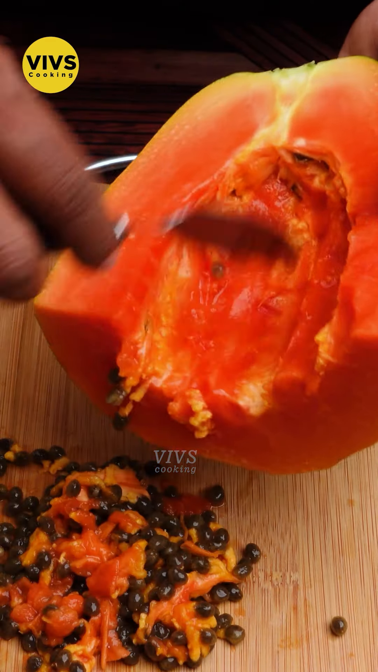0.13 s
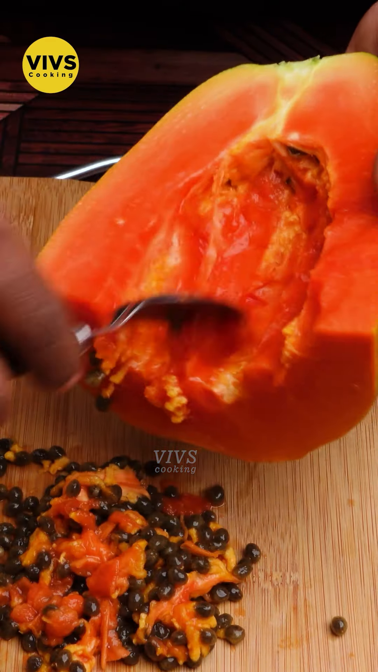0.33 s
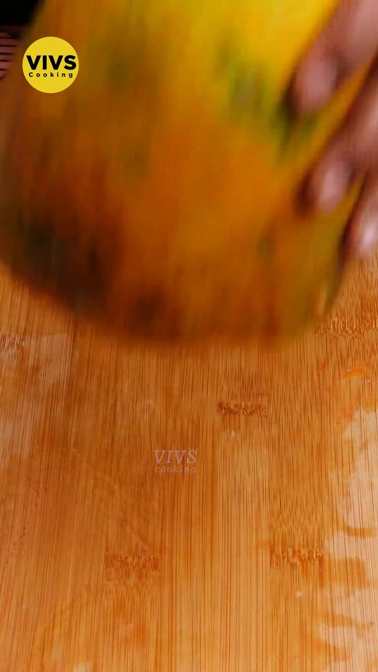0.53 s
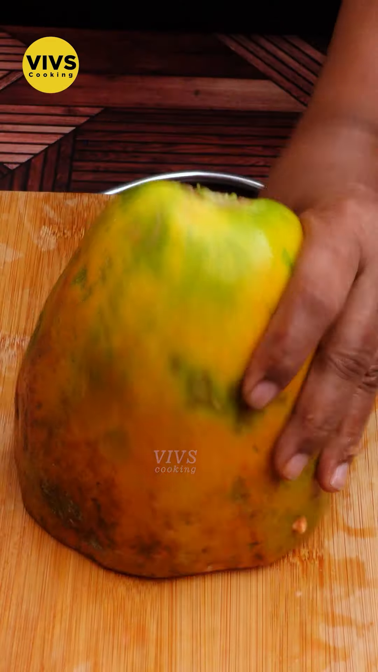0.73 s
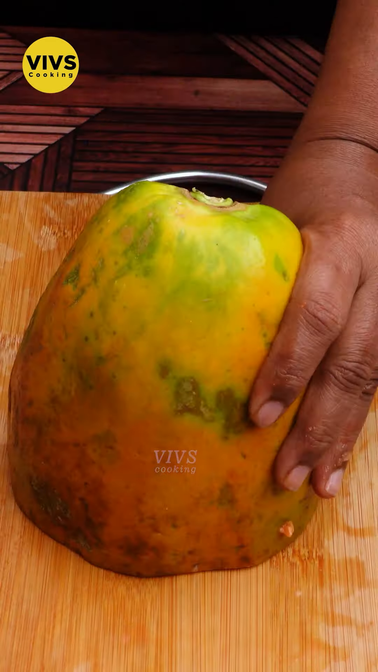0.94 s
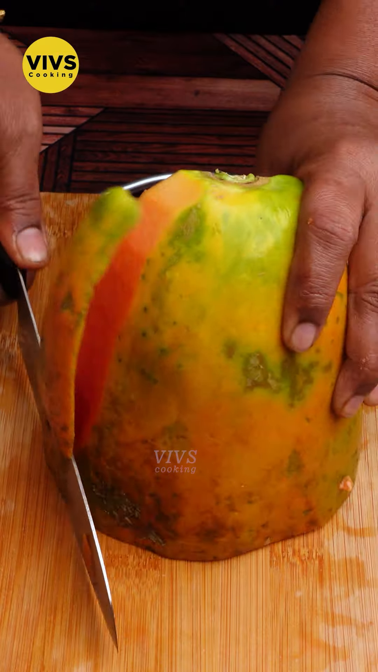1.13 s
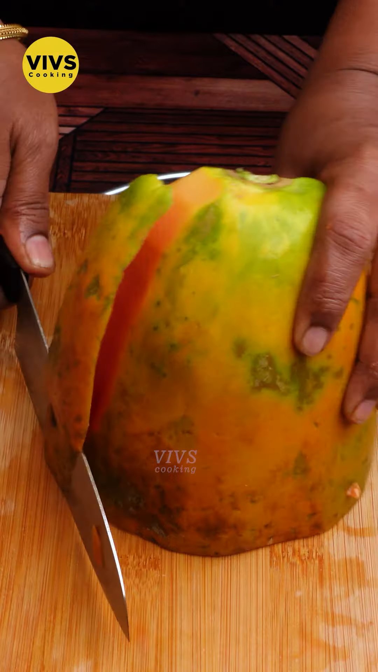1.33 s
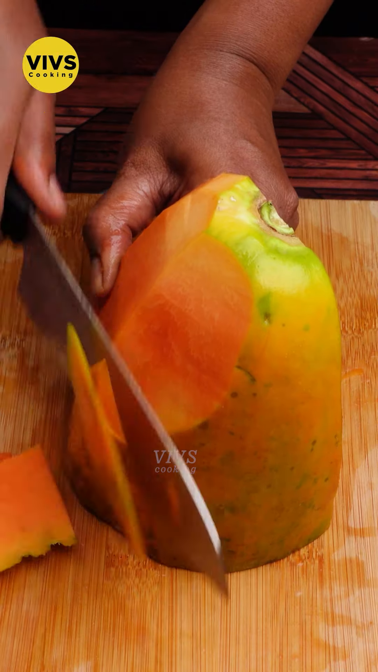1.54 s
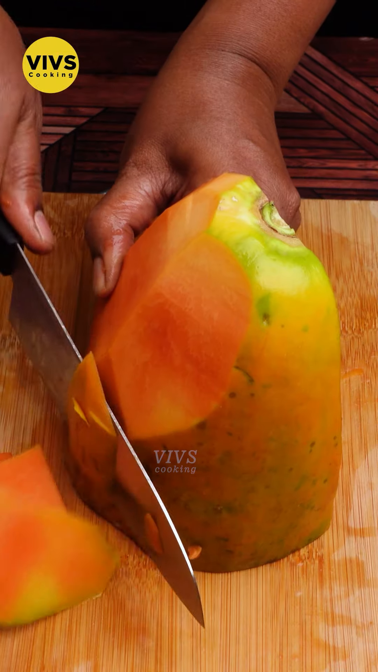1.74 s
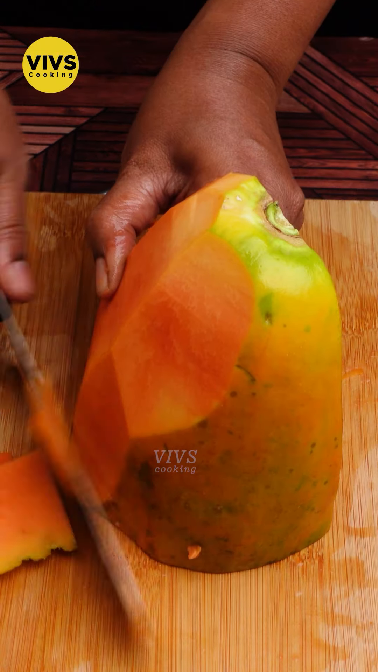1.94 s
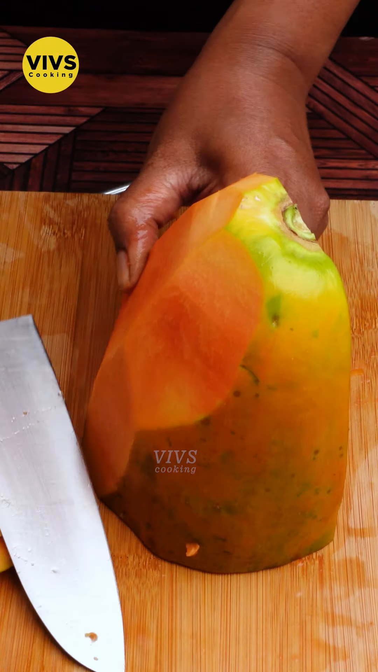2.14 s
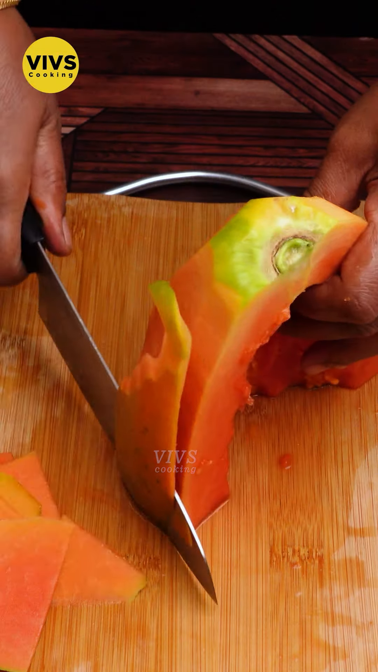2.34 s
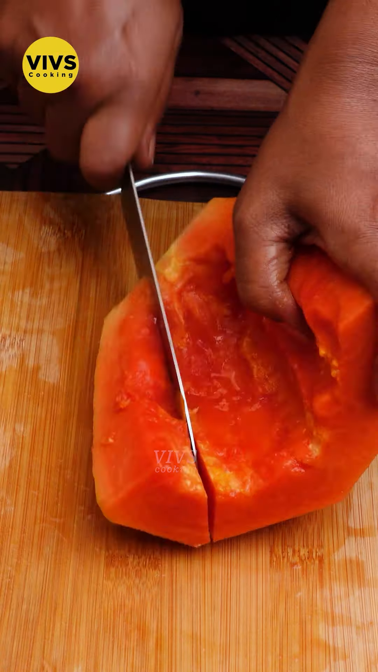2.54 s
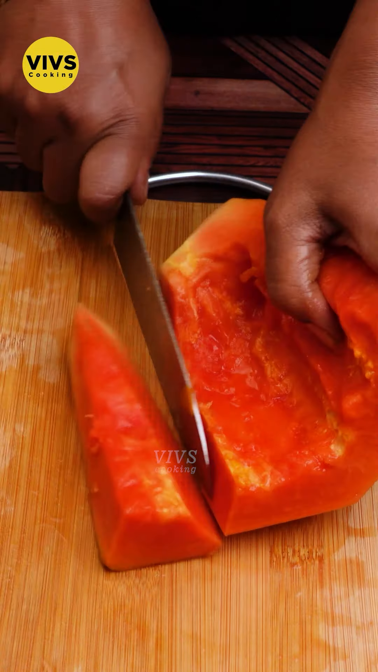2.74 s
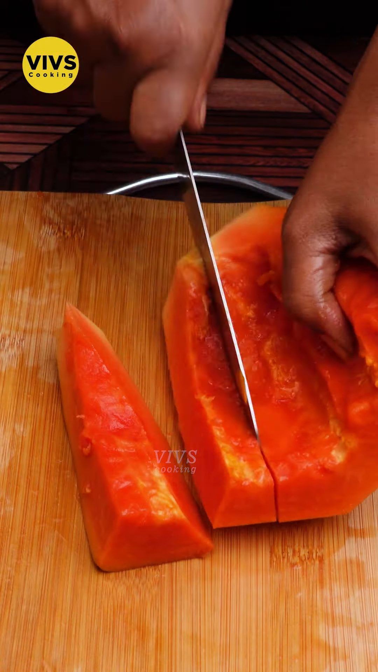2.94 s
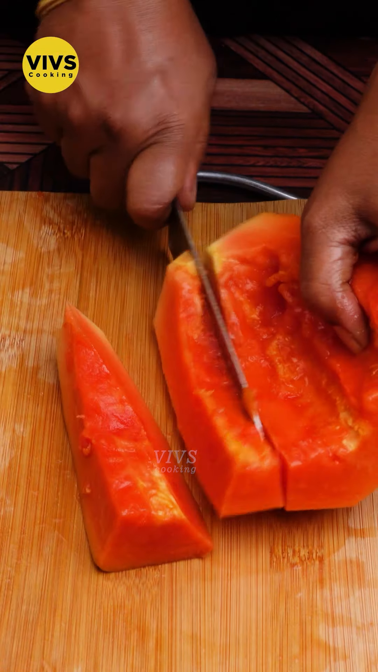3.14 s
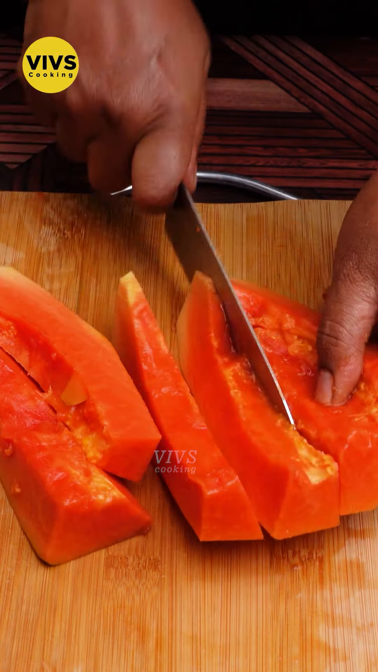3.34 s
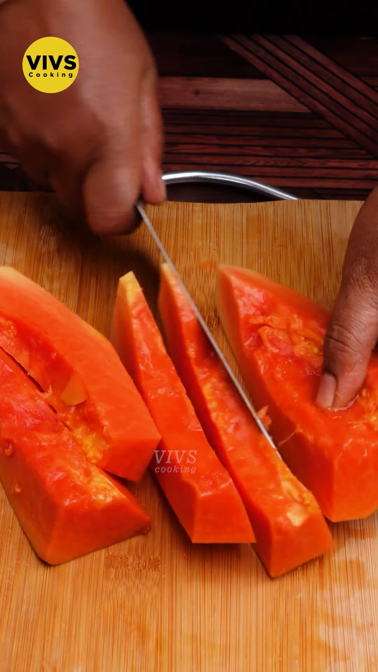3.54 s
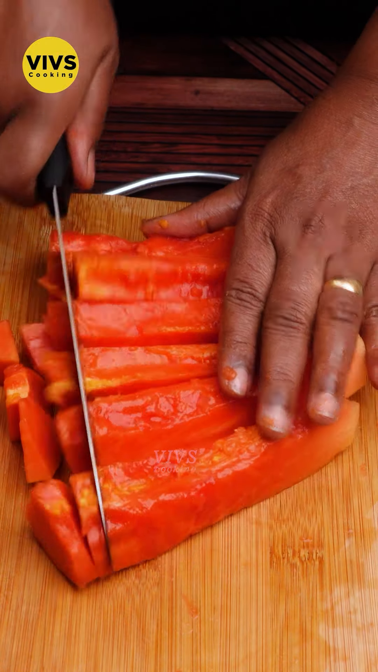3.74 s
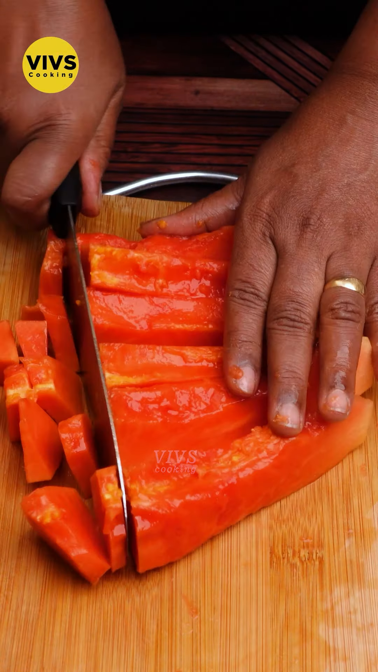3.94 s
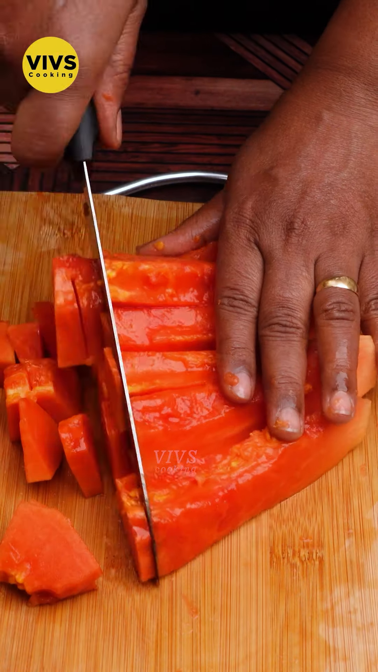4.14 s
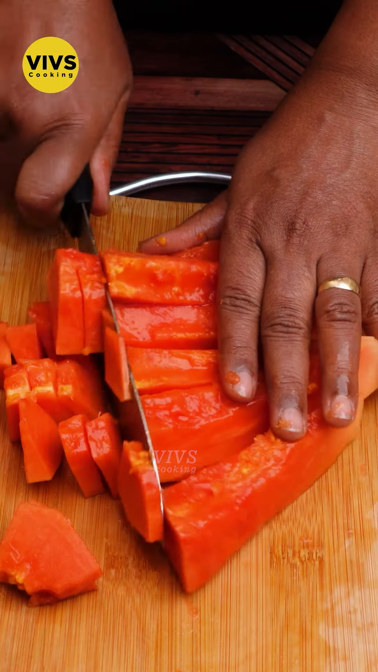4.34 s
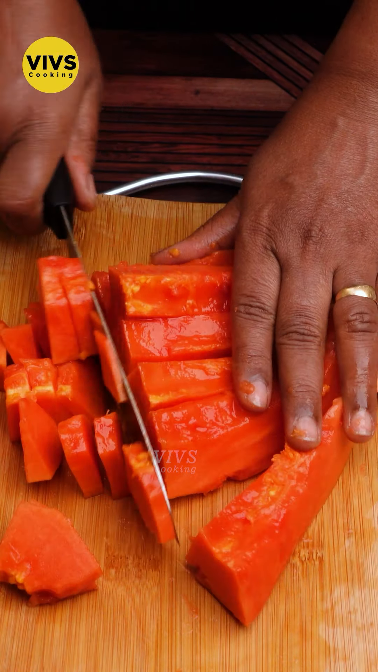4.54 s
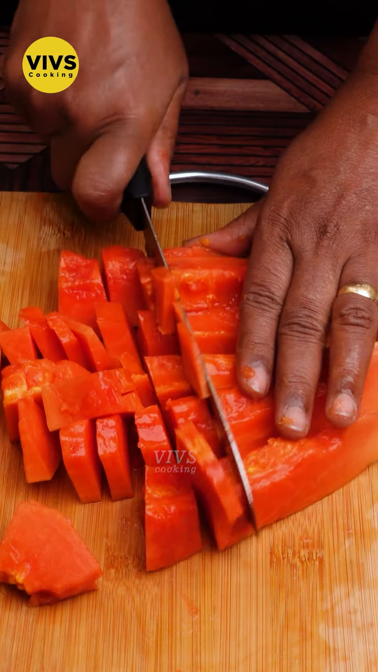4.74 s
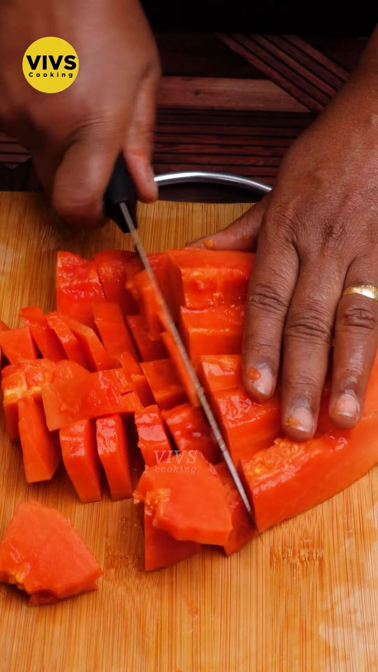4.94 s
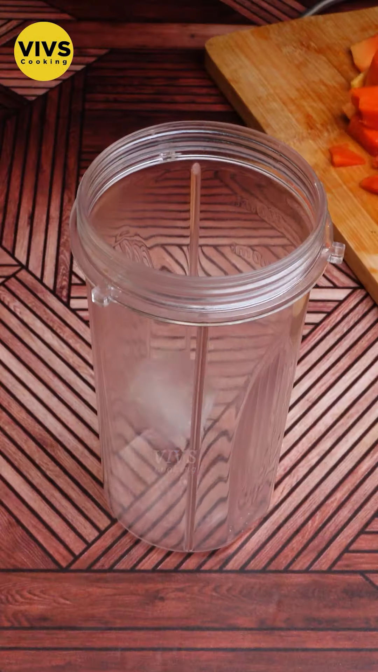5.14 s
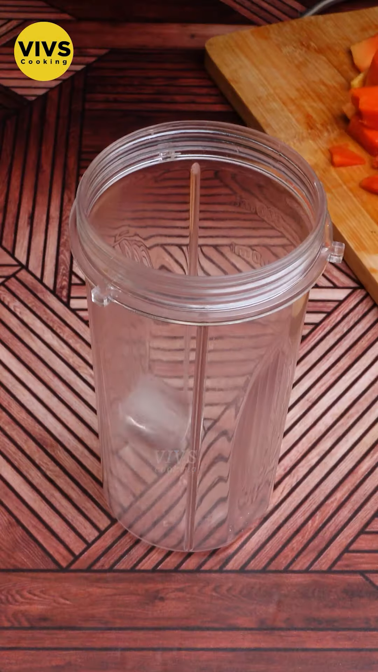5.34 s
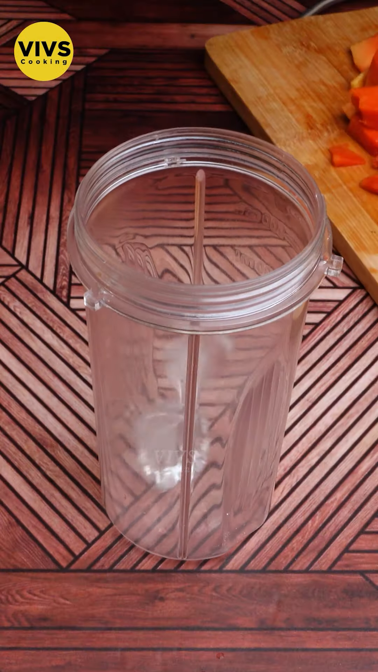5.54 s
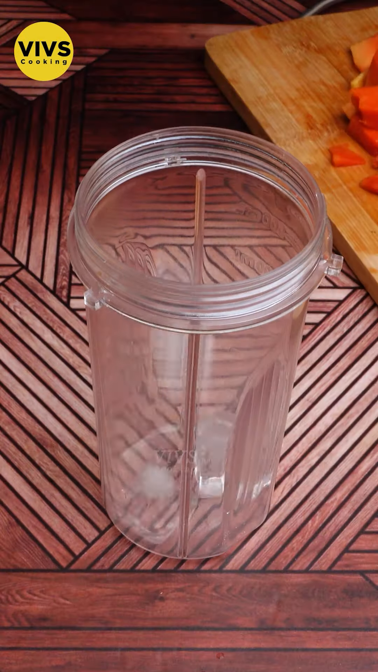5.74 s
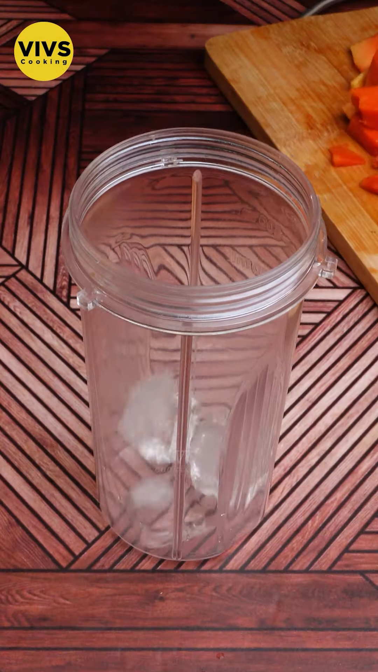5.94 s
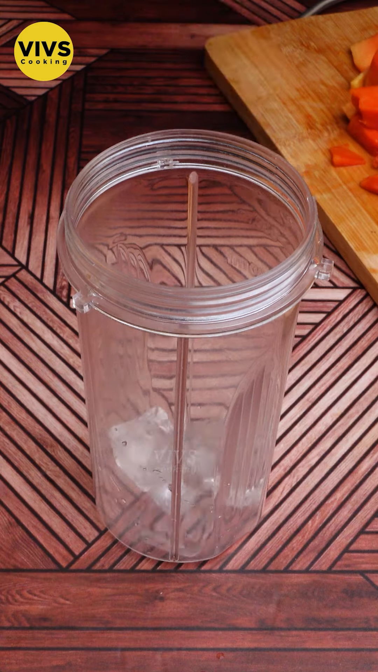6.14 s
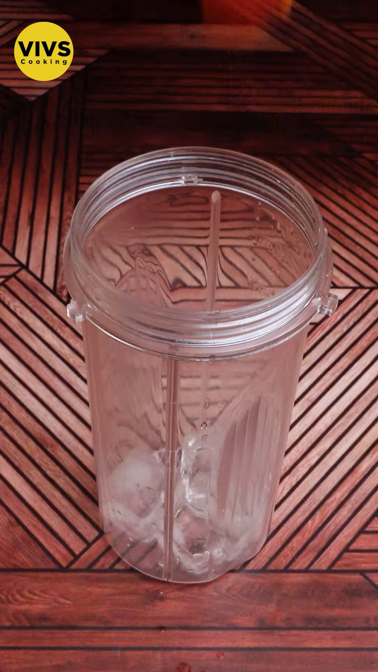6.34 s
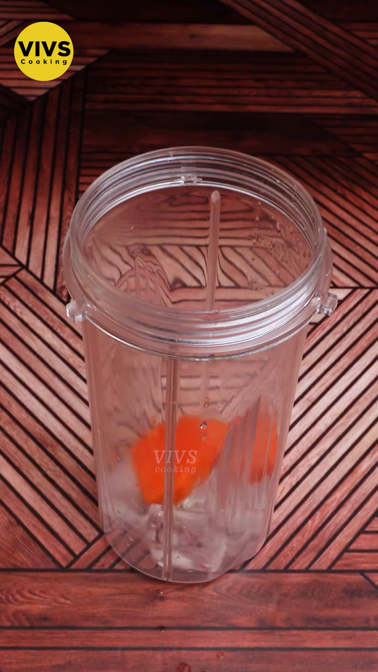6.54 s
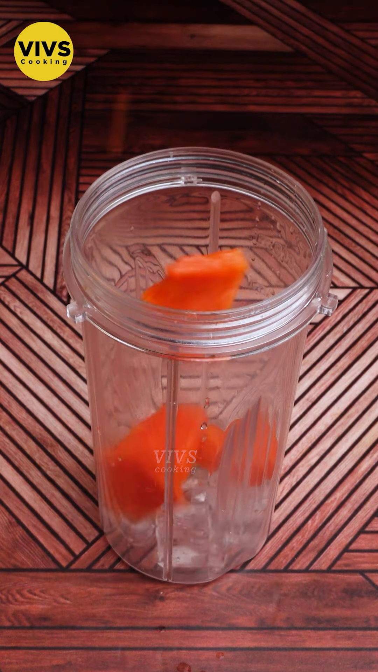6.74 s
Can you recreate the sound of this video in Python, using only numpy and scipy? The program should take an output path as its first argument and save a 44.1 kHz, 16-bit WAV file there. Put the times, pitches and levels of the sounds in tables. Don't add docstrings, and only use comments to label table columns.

```python
import sys
import numpy as np
from scipy import signal
from scipy.fft import rfft, irfft, next_fast_len
from scipy.io import wavfile
from scipy.ndimage import uniform_filter1d, minimum_filter1d, map_coordinates

SR = 44100
rng = np.random.default_rng(int(sys.argv[2]) if len(sys.argv) > 2 else 0)


def undo_db(level):
    steps = np.asarray(level, float) / 20
    return 10 ** steps


def persist_wave(psi):
    counts = np.round(np.clip(psi, -1, 1) * 32767).astype(np.int16)
    wavfile.write(sys.argv[1], SR, np.atleast_2d(counts).T)


N = 303849
TIME = np.arange(N) / SR
JAR_START = 5

# (time [s], knock peak [dB], echo [dB], thump over echo [dB], edge over echo [dB])
BOARD_BLOWS = [(0.816, -3.5, -23.5, 10, 0.5), (1.196, 8.5, -2.5, -10, -15), (1.888, 11, 0.5, -9.5, -8.5),
               (2.034, -20.5, -34, -8, 1), (2.417, -12, -22.5, -6.5, -35), (2.661, -2, -8.5, -7.5, -9),
               (2.802, -12, -22.5, -6.5, -6.5), (3.114, 11, -3.5, -8.5, -10),
               (3.457, -14.5, -21.5, -0.5, -11), (3.843, 20, 1.5, -13, -11), (4.336, -14.5, -14.5, -9, -19),
               (4.767, -3, -10, -9, -13)]
BLOW_SPOTS = [1.01, 1.134, 1.02, 1.01, .96, 1.074, 0.85, 1, 0.94, 1.185, 1.144, 0.94]
# (low [Hz], high [Hz])
BOARD_BANDS = [(480, 1410), (1150, 2117), (2300, 3590), (3600, 6580)]
# (pitch [Hz], width [Hz], level [dB])
TABLE_MODES = [(75, 25, -10), (124, 14, -4.5), (163, 36, 6.5), (194, 150, 0.5), (269, 330, -10)]
# (frequency [Hz], time to fall 60 dB [s])
ROOM_RING = [(150, 0.23), (800, 0.35), (1700, 0.26), (2800, 0.23), (5500, 0.2), (12000, 0.26)]

# (start [s], end [s])
BOUNCES = [(5.103, 5.162), (5.162, 5.365), (5.365, 5.449), (5.539, 5.782), (5.859, 6.049), (6.138, 6.416),
           (6.545, 6.717), (6.765, 6.811), (6.811, 6.9)]
# (rattle [dB], air [dB], wall [dB], ice fizz [dB], settling [dB a second])
BOUNCE_LOADS = [(-18, -45, -29, -22, 191), (-14, -15.5, -14.5, -19.5, 64), (-16, -19, -18.5, -19, -0.5),
                (-15.5, -30.5, -18.5, -22.5, 0), (-18, -26.5, -16.5, -17.5, 17), (-17, -34.5, -19, -22, 13),
                (-14, -22.5, -15, -24, 55), (-37.5, -25.5, -43, -36.5, 147), (-12, -35, -27, -22, 39)]
# (wall [Hz], rattle [Hz])
FAVOURED_NOTES = [(1530, 2400), (1035, 2450), (1790, 2900), (1530, 2300), (1600, 2400), (1530, 2400),
                  (1530, 2300), (968, 2260), (1530, 2400)]
SWELL_SHARES = [1.22, 0.42, 0.37, 1]
# (time [s], peak [dB], body [dB], swell of the rattle [dB])
CLEAR_STRIKES = [(5.103, -9, -13.5, 4.5), (5.1629, 0.9, -9, 2), (5.1984, -6.5, -3, 8),
                 (5.2751, 1.5, -10.5, 11.5), (5.3003, 0, -13, 7.5), (5.3656, 2.5, -9.5, 1.5),
                 (5.4086, -4.5, -3.5, 7), (5.5469, -6, -9.5, 0), (5.5576, -9.5, -2, 5),
                 (5.5962, -11, -11.5, 3.5), (5.6452, -6.5, -12.5, 3.5), (5.6582, 2.5, -15.5, 9),
                 (5.7007, 0, -14, 7.5), (5.7164, -5.5, -9, -1.5), (5.7638, 1.5, -16.5, 3),
                 (5.862, -6, -8.5, 4.5), (5.9282, -7.5, -1.5, 8), (5.9561, 2.2, -9.5, 10),
                 (6.0454, -5, -12, 4), (6.1371, 0.5, -14, 6), (6.1868, -10.5, -13, 5),
                 (6.219, -20.5, -7.5, -0.5), (6.2964, -8, 2, 1), (6.383, -8, -12, 2),
                 (6.5469, -5.5, 0.5, 7.5), (6.5935, -10, -5, 6.5), (6.656, -19, 1.3, 2),
                 (6.7755, -23.5, -12.5, 2.5), (6.8158, -11, -11.5, 1), (6.8626, -7, -6.5, 0.5)]
# (pitch [Hz], width [Hz], level [dB])
JAR_MODES = [(520, 18, -2), (548, 22, -5), (750, 30, -8), (968, 25, -8), (1220, 35, -12), (1435, 40, -7),
             (1530, 30, 0), (1640, 30, -4), (1790, 50, -9), (1960, 35, -9), (2260, 45, -1), (2400, 40, 0),
             (2520, 45, -1), (2850, 70, -8), (3105, 50, -5), (3320, 60, -9), (3700, 90, -9), (4190, 55, -7),
             (5010, 50, -11), (5300, 90, -13), (5800, 110, -14), (6970, 150, -19)]
# (frequency [Hz], level [dB per Hz])
ICE_COLOUR = [(350, -62), (600, -19.5), (944, -2.5), (1050, -9.5), (1490, -9), (1850, -13), (2340, -5),
              (2830, -6.5), (6200, -10), (16000, -40)]
# (time [s], level [dB])
FRUIT_PLOPS = [
    (6.56, -55.5),
    (6.641, -51),
    (6.78, -60.5),
]

# (landing [s], hiss
# [dB], time to grow 40 dB [s], time at full hiss [s])
LANDING_HISSES = [(.816, -46, .05, .002), (1.195, -33, .04, .004), (1.887, -23, .035, .014),
                  (2.417, -38, .08, .03), (2.659, -41, .03, .04), (3.113, -21, .07, .008),
                  (3.456, -29, .065, .005), (3.842, -27, .05, .015), (4.335, -39, .05, .004),
                  (4.765, -22, .05, .01)]
# (time [s], hiss [dB], time to grow 40 dB [s], hold [s])
FLESH_WIPES = [(.8175, -20.5, .003, .014), (1.635, -30, .05, .05), (2.266, -55, .025, .002),
               (2.43, -50, .03, .01), (2.482, -43.5, .02, .002), (3.538, -44, .08, .005),
               (4.385, -37, .085, .035), (4.445, -38, .015, .005), (4.772, -32, .004, .035),
               (4.998, -60, .02, .035)]
# (frequency [Hz], level [dB per Hz])
FLESH_COLOUR = [(710, -33), (1200, -6), (1470, -21), (2090, -5.5), (2590, -4), (2920, -1), (4170, -2),
                (5020, -4), (6720, -6.5), (11300, -17), (16000, -33)]
# (time [s], level [dB], pitch [Hz])
PEEL_SLIDES = [
    (1.521, -52.5, 840),
    (1.692, -41, 918),
]
# (time [s], peak [dB], pitch [Hz])
SMALL_SNAPS = [(.0154, -24, 4800), (.4534, -25, 6800), (2.0348, -8, 3300), (3.5274, -30, 5500),
               (4.4448, -19, 4800), (4.9714, -56, 7000)]

# (time [s], pressed for [s], scrape [dB], pulp [dB])
SPOON_STROKES = [
    (.02, 0.059, -47, -57),
    (0.409, 0.037, -41.5, -47),
]
# (time [s], level [dB])
BOWL_RINGS = [
    (.022, -51),
    (0.073, -33),
    (0.41, -29.5),
    (.47, -69),
]

# (start [s], level [dB])
SHOT_HUMS = [(0, -63), (.52, -73.5), (1.12, -65), (1.55, -68), (2.1, -66.5), (2.7, -68), (4.298, -66),
             (5.0, -69.5)]
# (frequency [Hz], level [dB per Hz])
HUM_COLOUR = [(30, -45), (160, -15), (400, -7), (1000, -4), (1550, -7), (1780, 2), (2000, -9), (4000, -17),
              (8000, -24), (13000, -33), (16000, -42)]


def unit(x):
    return x / np.sqrt(np.mean(x ** 2) + 1e-20)


def along(points, hz):
    f, v = np.transpose(points)
    return np.interp(np.log(hz + 1), np.log(f + 1), v)


def filtered(x, response):
    m = next_fast_len(x.shape[-1] + 8192)
    spectrum = rfft(x, m) * response(np.fft.rfftfreq(m, 1 / SR))
    return irfft(spectrum, m)[..., :x.shape[-1]]


def peak(hz, width_hz):
    return lambda f: 1j * f * width_hz / (hz * hz - f * f + 1j * f * width_hz)


def band(low_hz, high_hz):
    def response(f):
        x = 1j * (f * f - low_hz * high_hz) / ((f + 1e-6) * (high_hz - low_hz))
        first = x * x + 2 * np.sin(np.pi / 8) * x + 1
        second = x * x + 2 * np.cos(np.pi / 8) * x + 1
        return 1 / (first * second)
    return response


def stereo(mid, side, side_db):
    return np.array([mid + undo_db(side_db) * side, mid - undo_db(side_db) * side])


def noise(response, side_db, grit_db=0., count=N):
    grit = undo_db(grit_db * unit(uniform_filter1d(rng.standard_normal(count), size=60)))
    mid, side = filtered(rng.standard_normal((2, count)) * grit, response)
    return np.pad(unit(stereo(mid, side, side_db)), ((0, 0), (0, N - count)))


def tail(side_db):
    hz, t, z = signal.stft(rng.standard_normal((2, SR // 2)), SR, nperseg=256)
    dying = z * undo_db(-60 * t / along(ROOM_RING, hz)[:, None])
    mid, side = signal.istft(dying, SR, nperseg=256)[1]
    return stereo(mid, side, side_db)


def add(out, s, x):
    part = out[..., round(s * SR):][..., :x.shape[-1]]
    part += x[..., :part.shape[-1]]


def fading(db, t, t60, rise):
    level = db - 60 * t / t60
    return undo_db(level - 1.1 * np.maximum(0, -47.0 - level)) * (1 - np.exp(-t / rise))


def swell(s, db, held_s, rise, fall):
    level = db - rise * np.maximum(0, s - TIME) - fall * np.maximum(0, TIME - s - held_s)
    gain, heard = np.zeros(N), level > -120
    gain[heard] = undo_db(level[heard])
    return gain


def board_knock(blow, echo_db):
    def wood(f):
        return sum(undo_db(level - edges[0] / 400) * band(*edges)(f)
                   for level, edges in zip(echo_db, BOARD_BANDS))
    knock = filtered(blow[:2000], wood)
    click = undo_db(-60 * TIME[:len(knock)] / 0.0026) * rng.standard_normal(len(knock))
    return knock / np.abs(knock).max() + .015 * click


def table_response(f):
    return sum(undo_db(db) * peak(hz, width_hz)(f) ** 2 for hz, width_hz, db in TABLE_MODES)


def chops():
    out, t = np.zeros((2, N)), TIME[:18000]
    for k, (s, db, body_db, thump_db, edge_db) in enumerate(BOARD_BLOWS):
        fruit = k == 0
        echo_db = body_db + np.array([thump_db, 0, edge_db, edge_db - 7])
        blow = undo_db(-60 * t / .015) * rng.standard_normal(len(t))
        add(out, s, undo_db(db + 6.5) * board_knock(blow, echo_db))

        damping = .75 if fruit else 1
        rise_s = np.interp(body_db, [-22, -2], [0.012, 0.02])
        grain = list(zip(np.geomspace(400, 8000, num=26), rng.normal(0, 2.5, size=26)))
        for level, edges in zip(echo_db, BOARD_BANDS):
            def spot(f):
                return band(*edges)(f / BLOW_SPOTS[k]) * undo_db(along(grain, f))
            mid, side = unit(filtered(rng.standard_normal((2, len(t))), spot))
            fade = fading(level + 5, t, damping * along(ROOM_RING, np.mean(edges)), rise=rise_s)
            add(out, s, fade * stereo(mid, side, -13))

        heavy_db, slow_s = (-20, .02) if fruit else (0.26 * echo_db[0] - 36, .06)
        drone = unit(filtered(rng.standard_normal(len(t)), table_response))
        add(out, s, fading(heavy_db, t, 0.47, rise=slow_s) * drone)
        hollow = unit(filtered(rng.standard_normal(len(t)), band(340, 480)))
        add(out, s, fading(echo_db[0] - 7.5, t, 0.4, rise=0.21) * hollow)
    return out


def jar_ringing(blows, now, bounce):
    n = len(now)
    modes = np.zeros((4, n))
    for hz, width_hz, db in JAR_MODES:
        mood = map_coordinates(rng.standard_normal(200), [now * 22], order=1)
        octaves = np.log2(hz / np.array(FAVOURED_NOTES))
        near = np.exp(-(octaves / 0.081) ** 2).max(1)
        drive = blows * rng.standard_normal(n) * undo_db(db + 4 * mood + 6.5 * near[bounce])
        note = peak(hz, np.clip(1.5 * width_hz, 20, 240))
        modes[np.searchsorted([650, 1900, 4500], hz)] += filtered(drive, lambda f: note(f) ** 2)
    return modes


def ice_cracks(blows):
    n = len(blows)
    strength = signal.fftconvolve(np.sqrt(blows), undo_db(-60 * TIME[:900] / .03))[:n]
    cracks = strength * rng.standard_normal(n)
    return [unit(filtered(cracks, lambda f: undo_db(along(ICE_COLOUR, f)) * band(*edges)(f)))
            for edges in ((650, 1900), (1900, 4500), (4500, 16000))]


def tumbling(now, bounce, starts, ends):
    n = len(now)
    chance = rng.random((2, n))
    blows = (chance[0] < 330 / SR) * undo_db(-2.5 * np.log(chance[1]))
    deep, wall, rattle, high = jar_ringing(blows, now, bounce)
    wall_ice, body_ice, fizz_ice = ice_cracks(blows)
    layers = (unit(rattle) + 0.59 * body_ice, filtered(deep, band(430, 1000)),
              unit(wall) + 0.45 * wall_ice, fizz_ice + 0.51 * unit(high))

    swell_db, duck_db, t = np.zeros(n), np.zeros(n), TIME[:2500]
    peak_s = 0.01
    for s, db, _, rattle_db in CLEAR_STRIKES:
        add(duck_db, s - JAR_START, -.55 * max(0, db + 19) * np.exp(-t / .012))
        add(swell_db, s - JAR_START, rattle_db * t / peak_s * np.exp(1 - t / peak_s))

    load = np.array(BOUNCE_LOADS)[bounce].T
    settle_db = -load[-1] * (np.clip(now, starts[bounce], ends[bounce]) - starts[bounce])
    room = tail(side_db=-11)
    out = np.zeros((2, n))
    for k, layer in enumerate(layers):
        both = unit(layer) + 0.76 * unit(signal.fftconvolve(layer[None], room, axes=1)[:, :n])
        both /= np.sqrt(np.abs(uniform_filter1d(both.mean(0) ** 2, size=1700)) + 1e-9)
        out += both * undo_db(load[k] + settle_db + SWELL_SHARES[k] * swell_db + duck_db)
    return out


def clear_strikes(n):
    out, t = np.zeros((2, n)), TIME[:2500]

    def snap_colour(f):
        return band(1200, 6500)(f) + .25 * band(6500, 12000)(f) + .04

    for s, db, body_db, _ in CLEAR_STRIKES:
        burst = rng.standard_normal(len(t)) + .3 * rng.standard_normal((2, len(t)))
        snap = filtered(undo_db(-60 * t / .024) * burst, snap_colour)
        crack = undo_db(db - 7 - 60 * t[:60] / .002) * rng.standard_normal(60)
        add(out, s - JAR_START, crack)
        ring = np.zeros(len(t))
        for hz, _, level in JAR_MODES:
            fade = undo_db(level + rng.normal(0, 6) - 60 * t / 0.04)
            ring += fade * np.sin(2 * np.pi * hz * t + 3 * rng.random())
        strike = snap / np.abs(snap).max() + undo_db(body_db + 1.5) * ring / np.abs(ring).max()
        add(out, s - JAR_START, undo_db(db + 4) * strike)
    return out


def bounce_gate(now, bounce, starts, ends):
    early, late = starts[bounce] - now, now - ends[bounce]
    lingering_db = np.where(late > 0, -27 - 480 * late, 0)
    gate_db = np.where(early > 0, -30.5 - 860 * early, lingering_db)
    joined = sum((now > a) & (now <= b) for a, b in BOUNCES) > 0
    return uniform_filter1d(np.where(joined, 1, undo_db(gate_db)), size=24)


def fruit_plops(n):
    out, t = np.zeros(n), TIME[:6000]
    for s, db in FRUIT_PLOPS:
        thump = unit(filtered(rng.standard_normal(len(t)), band(130, 240)))
        add(out, s - JAR_START, fading(db + 23.5, t, 0.4, rise=.02) * undo_db(-16.5) * thump)
    return out


def jar():
    now = TIME[JAR_START * SR:]
    n = len(now)
    starts, ends = np.transpose(BOUNCES)
    bounce = np.clip(np.searchsorted(starts, now) - 1, 0, None)
    coming = np.clip(np.searchsorted(starts - .03, now) - 1, 0, None)
    bounce = np.where(now > ends[bounce], coming, bounce)
    out = tumbling(now, bounce, starts, ends) + clear_strikes(n)
    out = out * bounce_gate(now, bounce, starts, ends)
    out = filtered(out, band(440, 17000))
    out += fruit_plops(n)
    add(out, BOUNCES[4][1] - .002 - JAR_START, undo_db(-30) * np.hanning(90))
    return np.pad(out, ((0, 0), (N - n, 0)))


def tearing():
    gain = np.zeros(N)
    for s, db, lead_s, full_s in LANDING_HISSES:
        gain += swell(s - full_s, db, full_s, 40 / np.clip(lead_s, .002, 1), fall=1500)
    for s, db, lead_s, held_s in FLESH_WIPES:
        gain += swell(s, db, held_s, 40 / np.clip(lead_s, .002, 1), fall=304)
    return gain * noise(lambda f: undo_db(along(FLESH_COLOUR, f)), side_db=-11.5, grit_db=1.5)


def peel_squelch():
    out = np.zeros((2, N))
    for s, db, hz in PEEL_SLIDES:
        wet = noise(lambda f: peak(hz, 190)(f) ** 2, side_db=-18.5, grit_db=5.0, count=2 * SR)
        out += swell(s, db, 0, rise=310, fall=330) * wet
    return out


def small_snaps():
    out, t = np.zeros((2, N)), TIME[:600]
    for s, db, hz in SMALL_SNAPS:
        snap = filtered(undo_db(-60 * t / .005) * rng.standard_normal(len(t)), band(.55 * hz, 1.5 * hz))
        add(out, s, undo_db(db) * snap / np.abs(snap).max())
    return out


def spoon():
    scrape = noise(lambda f: peak(5600, 4500)(f) * band(2800, 10500)(f),
                   side_db=-11.0, grit_db=2, count=SR)
    bowl = noise(lambda f: peak(2820, 160)(f) ** 2, side_db=-18, grit_db=3, count=SR)
    pulp = noise(lambda f: peak(1900, 1500)(f) ** 2 + 0.27 * peak(450, 500)(f) ** 2,
                 side_db=-6.0, grit_db=-2.5, count=SR)
    out = sum(swell(s, db, 0, rise=690, fall=360) for s, db in BOWL_RINGS) * bowl
    for s, held_s, scrape_db, pulp_db in SPOON_STROKES:
        out += swell(s, scrape_db, held_s, rise=370, fall=240) * scrape
        out += swell(s, pulp_db, held_s, rise=230, fall=150) * pulp
    return out * swell(0, 0, 0.487, rise=0, fall=370)


def kitchen_hum():
    s, db = np.transpose(SHOT_HUMS)
    shot_db = uniform_filter1d(db[np.searchsorted(s[1:], TIME)], size=2000)
    return undo_db(shot_db) * noise(lambda f: undo_db(along(HUM_COLOUR, f)), side_db=-9.0, grit_db=1.5)


def scene():
    at_board = chops() + tearing() + peel_squelch() + small_snaps() + spoon()
    return at_board * undo_db([[-.6], [.6]]) + jar() * undo_db([[-.3], [.3]]) + kitchen_hum()


def recover(need, step):
    ramp = step * np.arange(len(need))
    reduction = np.log(1 - need + 1e-12)
    return 1 - np.exp(np.maximum.accumulate(reduction + ramp) - ramp)


def roll_off(x):
    return signal.sosfilt(signal.butter(12, 16670, fs=SR, output="sos"), x)


def record(dry):
    need = np.minimum(1, .75 / (np.abs(dry).max(0) + 1e-9))
    gain = recover(minimum_filter1d(need, size=121), 1 / (0.063 * SR))
    held = dry * uniform_filter1d(gain, size=61)
    mix = filtered(held, lambda f: f < 16100)
    return roll_off(mix)


dry = scene()
out = record(dry)
persist_wave(out)
```